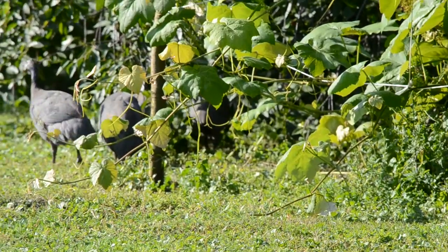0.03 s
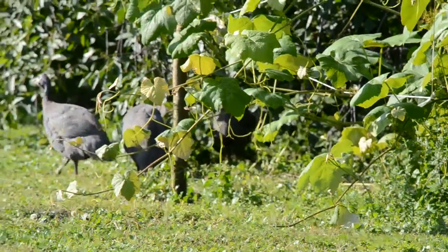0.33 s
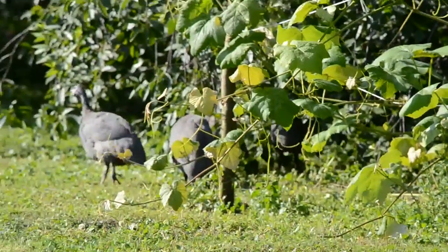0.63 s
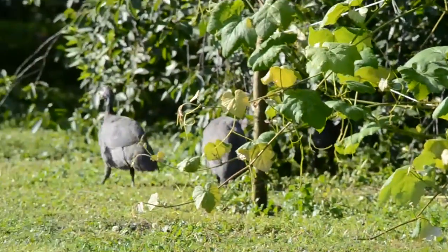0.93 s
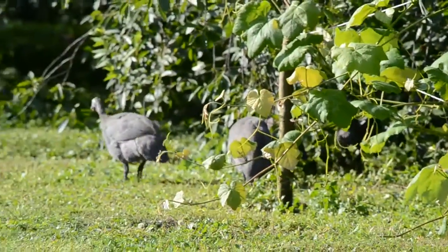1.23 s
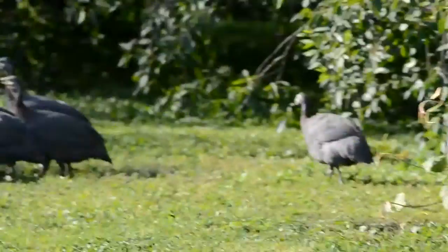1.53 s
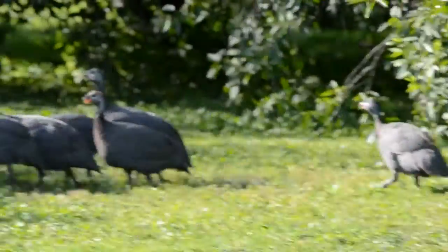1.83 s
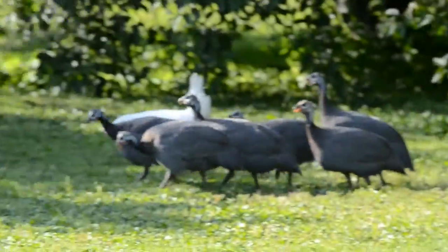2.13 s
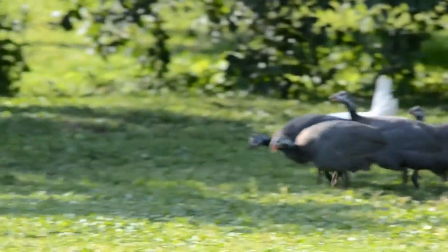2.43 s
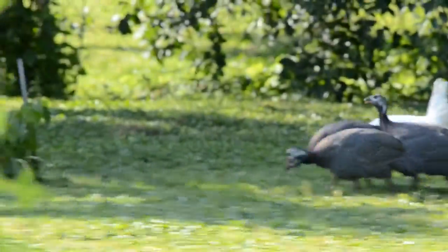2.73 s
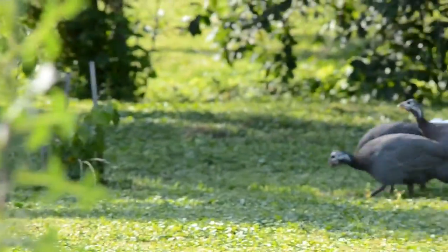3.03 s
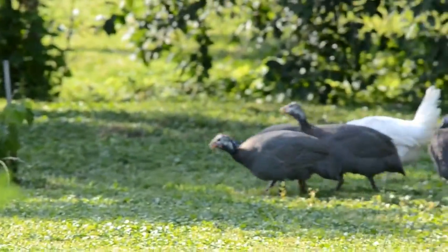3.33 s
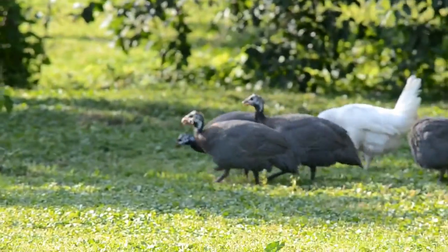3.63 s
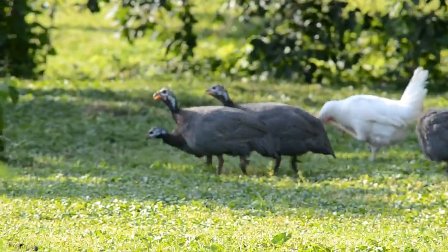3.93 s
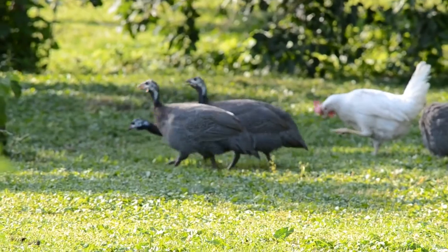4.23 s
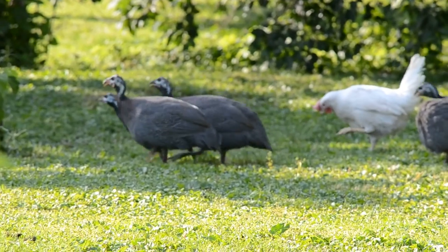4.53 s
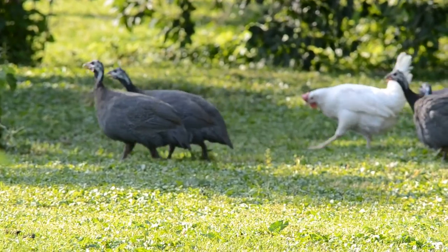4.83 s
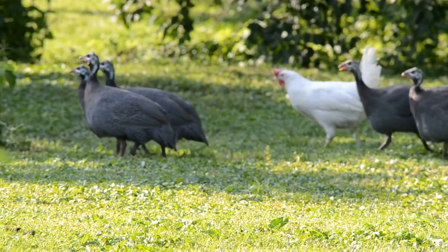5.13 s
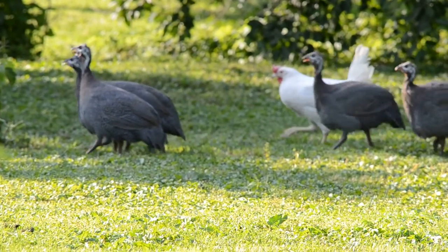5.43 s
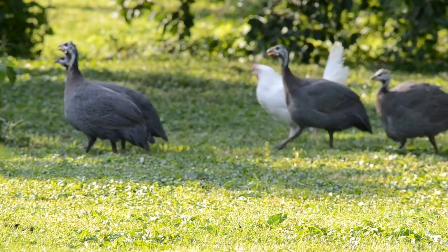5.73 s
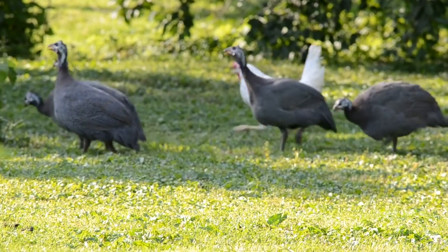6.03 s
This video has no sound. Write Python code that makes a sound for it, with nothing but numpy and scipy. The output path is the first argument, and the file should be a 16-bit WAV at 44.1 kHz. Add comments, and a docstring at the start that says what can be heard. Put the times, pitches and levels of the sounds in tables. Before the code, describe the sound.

Guinea fowl give short, high, repeated chirps over a quiet garden hush, with a few camera handling knocks and dry grass crackles.

```python
"""Over a steady garden hush, guinea fowl cross a lawn, keeping in touch with short two-humped chirps
whose pitch and level follow vocal effort; hedges scatter the sound back. Dry snaps, distant peeps,
one hollow pip and two-note whistles join. From 0.7 s knocks ring the body of a panning hand-held
camera. Soft answers, far trills and leaf rustles follow; grass crackle peaks near 3 s."""
import sys
import numpy as np
from scipy import signal
from scipy.fft import rfft, irfft
from scipy.io import wavfile
from scipy.ndimage import map_coordinates

SR = 44100
rng = np.random.default_rng(int(sys.argv[2]) if len(sys.argv) > 2 else 0)


def store_pcm(level_fs):
    """Save levels as 16-bit WAV."""
    pcm = np.round(np.clip(level_fs, -1, 1) * 32767).astype(np.int16)
    wavfile.write(sys.argv[1], SR, np.atleast_2d(pcm).T)


N = 277389
T = np.arange(N) / SR

# Air in foliage: (frequency [Hz], relative density [dB])
HUSH_SPECTRUM = [(15, -70), (25, -19.5), (137, -9.5), (453, -2.5), (1220, -6.5), (1660, -8.5),
                 (2250, -10.5), (2550, -7.5), (3200, -11.5), (3640, -5), (4130, -14), (4460, -10),
                 (5460, -16.5), (8850, -26.5), (10800, -30), (14100, -39.5), (22000, -120)]
# Nearest birds: (crest time [s], rise [s], level [dB], second hump gain [dB], scattered share [0-1])
NEAR_CHIRPS = [(.01, 0.022, -38.5, -3, 0.42), (0.708, 0.035, -36.5, 1.5, 0.42),
               (.737, 0.033, -36, -4, 0.42), (1.445, 0.052, -36.5, -2.5, 0.19),
               (1.941, 0.05, -36.5, -2, 0.07), (2.007, 0.043, -38.5, 2.5, 0.48),
               (2.381, 0.053, -43, 3, 0.3), (2.924, 0.06, -40, -1.5, 0.08), (3.292, 0.043, -36, 0, 0.08),
               (3.797, 0.029, -38.5, 2, 0.48), (4.246, .04, -39.5, .5, 0.29),
               (4.867, 0.044, -38, -2.5, 0.25), (5.54, 0.043, -39.5, -3, 0.31),
               (5.556, .027, -36, -2, 0.48), (6.104, 0.052, -39.5, 2.5, 0.17)]
# Chirp harmonics 2-4: (relative level in lead-in [dB], at full voice [dB])
CHIRP_OVERTONES = [(7.5, -23), (-5, -25.5), (-17, -36)]
# Hedge echo: (frequency [Hz], gain [dB])
HEDGE_SPECTRUM = [(100, 9), (500, 0.5), (1500, -0.5), (3300, 0), (4300, -2), (5200, 5), (12000, -3.5)]
# Dry snaps: (time [s], level [dB], decay [s], treble cut [Hz])
DRY_SNAPS = [(0.2221, -36, 0.0017, 5500), (1.2532, -33, 0.0021, 10700), (2.3159, -36.5, 0.0024, 17000),
             (3.0255, -49, 0.00092, 3040), (3.153, -50.5, .0014, 3000), (3.6702, -38.5, 0.0032, 14000),
             (4.913, -51.5, 0.0005, 8800), (6.093, -53.5, 0.0004, 9000)]
# Snaps, rustles and grass: (frequency [Hz], gain [dB])
CRACK_SPECTRUM = [(60, 1.5), (250, -9.5), (500, -4), (1400, -7.5), (2700, -2), (3400, -10), (4300, -4),
                  (5500, -12.5), (7500, -17.5), (9000, -15), (12000, -33)]
# Distant peeps: (start [s], length [s], middle pitch [Hz], slope [oct], arch [oct], level [dB])
FAR_PEEPS = [(0.417, 0.072, 3275, 0.24, 0.7, -55.5), (2.237, 0.033, 4580, .14, .05, -60.5),
             (4.049, .035, 4740, .22, .03, -55.5), (4.412, 0.032, 5320, -0.047, 0.023, -65),
             (5.06, 0.035, 2360, -0.41, -0.046, -62), (5.356, .058, 4320, -0.25, -0.016, -66),
             (5.424, .06, 2750, -.8, -0.025, -70), (5.749, 0.048, 5350, -0.028, 0.07, -63.5),
             (5.802, 0.034, 4060, -0.14, 0, -54.5)]
# Two-note whistles: (held note start [s], level [dB])
FAR_WHISTLES = [(0.655, -52.5), (1.547, -55), (2.686, -55), (3.62, -56.5), (4.492, -56.5), (5.452, -51.5)]
# Knocks on the camera: (time [s], level [dB], scrape length [s])
CAMERA_KNOCKS = [(.674, -46, 0.00235), (.701, -55, 0.0023), (.853, -54, .0024), (1.094, -39, 0.0043),
                 (1.3996, -23, 0.0028), (1.4228, -34, 0.0036), (1.55, -55, .0069), (1.617, -49, 0.0039),
                 (1.731, -55.5, 0.002), (1.912, -32, .0029), (1.967, -32, 0.0036), (2.808, -34, .0024),
                 (3.348, -43, 0.00488), (3.654, -42, .0028), (4.172, -47.5, 0.00084), (5.341, -55.5, 0.008),
                 (6.09, -48.5, 0.0021), (6.249, -58.5, 0.0027)]
# Camera body modes: (frequency [Hz], relative level [dB], t60 [s])
BODY_MODES = [(159, -18, 0.055), (223, -14, 0.062), (290, -21.5, 0.1), (351.7, -12.5, 0.074),
              (425.5, -8, 0.061), (550, -7.5, 0.036), (832, -4, 0.054), (976, -6.5, 0.046),
              (1270, 0, 0.034), (1413, 5.5, 0.011), (1533, 5.5, 0.026), (1913, -0.5, 0.012),
              (2314, 1.5, 0.022), (2840, -5, 0.04), (4460, 0.5, 0.0034), (5400, -5.5, 0.0066),
              (9300, 6, 0.0034)]
# Answers within the flock: (crest time [s], level [dB], second hump gain [dB])
SOFT_ANSWERS = [(1.149, -51, 3.5), (2.5, -47.5, 0.5), (3.883, -48, 3), (4.684, -49, -1), (6.006, -50, 1.5)]
# Distant trills: (first peak [s], length [s], warble rate [Hz], level [dB])
FAR_TRILLS = [(1.277, 0.057, 27, -51), (1.588, .095, 15, -55.5), (2.724, .11, 25.3, -56.5),
              (3.108, 0.083, 25.6, -55), (3.636, 0.13, 26, -56.5), (4.095, 0.069, 27, -47.5),
              (4.532, .095, 27, -55.5), (5.444, 0.083, 34, -54.5)]
# Leaves and grass: (time [s], level [dB], decay [s], bass cut [Hz])
LEAF_RUSTLES = [(1.7964, -56, 0.0047, 7100), (2.018, -43.5, 0.0054, 4400), (2.333, -42, 0.091, 500),
                (3.182, -55, 0.007, 5100), (3.244, -46, 0.0071, 3430), (3.4084, -55, 0.0016, 2520),
                (3.4132, -42, 0.014, 880), (3.4571, -48, 0.024, 1960)]


def undb(db):
    """Decibels to gain."""
    return 10 ** (np.asarray(db) / 20)


def unit_rms(x):
    """Scale to rms 1."""
    return x / np.sqrt(np.mean(x ** 2))


def add(out, time_s, x):
    """Mix x into out at time_s."""
    i = int(round(time_s * SR))
    x, i = x[max(-i, 0):], max(i, 0)
    out[i:i + len(x)] += x[:max(len(out) - i, 0)]


def wander(size, rate_hz):
    """Smooth random curve, spread about 1."""
    at = np.arange(size) * rate_hz / SR
    return map_coordinates(rng.standard_normal(512), [at], order=3, mode="wrap")


def butter(x, hz, kind, order=2):
    """Low-pass or high-pass."""
    return signal.sosfilt(signal.butter(order, min(hz, .45 * SR), kind, fs=SR, output="sos"), x)


def colour(x, spectrum):
    """Minimum-phase filter through (frequency [Hz], gain [dB]) points."""
    size = 4096
    hz, db = np.transpose(spectrum)
    bins_hz = np.arange(size // 2 + 1) * SR / size
    gain = undb(np.interp(np.log(bins_hz + 1), np.log(hz), db))
    cepstrum = irfft(np.log(gain))
    cepstrum[1:size // 2] *= 2
    cepstrum[size // 2 + 1:] = 0
    return signal.fftconvolve(x, irfft(np.exp(rfft(cepstrum))))[:len(x)]


def burst(x, db, span_s):
    """Scale x so that its energy, spread over span_s, has level db."""
    return x * undb(db) * np.sqrt(span_s * SR / np.sum(x ** 2))


def garden(hush_db=-61, sway_db=1.0, grass_db=-73, ticks_per_s=500, pass_s=3.0, spread_s=2.7):
    """Air hushes in foliage; grass crackles most as the flock hurries by."""
    hush = unit_rms(colour(rng.standard_normal(N), HUSH_SPECTRUM))
    hush *= undb(hush_db + sway_db * wander(N, 3.797))
    ticks = rng.standard_normal(N) * (rng.random(N) < ticks_per_s / SR) * undb(4 * wander(N, 14))
    grass = unit_rms(butter(colour(ticks, CRACK_SPECTRUM), 4400, "high"))
    passing = np.exp(-((T - pass_s) / spread_s) ** 2 / 2)
    return hush + undb(grass_db) * grass * passing


def chirp(rise_s, fall_s, crest_hz, hump_effort, hump_db, scattered):
    """Effort crests, sinks to a break and lifts again; pitch and level follow, the voice roughens."""
    hump_s, rest_hz, break_sag_hz, end_sag_hz = .037, 2783, 129.3, 205
    shoulder_effort, opening_effort = .42, .25
    closed_db, flutter_db, dull_db = -24, 4.0, -26
    jitter, drift, rasp, fray_rad = .053, .0139, .3, .5
    t = np.arange(0, rise_s + fall_s + hump_s, 1 / SR)
    stage = np.interp(t, np.cumsum([0, rise_s, fall_s, hump_s]), np.arange(4))
    up, down, again = (np.clip(stage - k, 0, 1) for k in range(3))
    swell = np.sin(np.pi / 2 * up ** 1.5) ** 2
    sink = shoulder_effort * (1 - down ** 8) + (1 - shoulder_effort) * np.cos(np.pi / 2 * down) ** 2
    effort = swell * sink + hump_effort * np.abs(np.sin(np.pi * again)) ** .797
    rough = np.interp(down ** 1.44, [0, 1], [.13, .773])
    # The membrane shakes in pitch and strength.
    pitch_hz = rest_hz + (crest_hz - rest_hz) * effort
    pitch_hz -= break_sag_hz * down ** 4 + end_sag_hz * again ** 2
    pitch_hz *= 1 + jitter * rough * wander(len(t), 384.9) + drift * wander(len(t), 90.8)
    phase = 2 * np.pi * np.cumsum(pitch_hz) / SR
    closed = np.exp(-effort / opening_effort) * (1 - .39 * down)
    level_db = closed_db * closed + hump_db * down ** 4
    level_db += flutter_db * np.sqrt(rough) * np.tanh(wander(len(t), 288.7))
    voice = np.sin(phase) + rasp * rough * wander(len(t), 1800) * np.cos(phase)
    # Reedy lead-in; at full voice the throat favours the fundamental.
    # Uneven cycles fray the overtones, foliage dulls them.
    frayed_phase = phase + fray_rad * np.sqrt(rough) * wander(len(t), 1100)
    for harmonic, (soft_db, full_db) in enumerate(CHIRP_OVERTONES, start=2):
        overtone_db = np.interp(up, [.25, .7], [soft_db, full_db]) + dull_db * scattered ** 2
        voice += undb(overtone_db) * np.sin(harmonic * frayed_phase)
    envelope = np.sqrt(2) * undb(level_db) * signal.windows.tukey(len(t), .06)
    return scatter(envelope * voice, scattered)


def scatter(x, share, decay_s=.0077):
    """A share of the call takes longer paths through grass and leaves, and blurs."""
    t = T[:SR // 16]
    paths = signal.fftconvolve(x, rng.standard_normal(len(t)) * np.exp(-t / decay_s))
    paths *= np.linalg.norm(x) / np.linalg.norm(paths)
    direct = np.pad(x, (0, len(t) - 1))
    return np.sqrt(1 - share) * direct + np.sqrt(share) * paths


def flock(typical_rise_s=.04, typical_fall_s=.035):
    """Nearest guinea fowl: the slower a chirp rises, the faster it falls."""
    out = np.zeros(N)
    for crest_s, rise_s, db, hump_db, scattered in NEAR_CHIRPS:
        fall_s = typical_fall_s * (typical_rise_s / rise_s) ** .41
        call = chirp(rise_s, fall_s, crest_hz=4317, hump_effort=.56, hump_db=hump_db, scattered=scattered)
        add(out, crest_s - rise_s, undb(db) * call)
    return out


def hedges(x, early_db=-12, early_t60_s=.28, late_db=-18, late_t60_s=.62):
    """Leaves return many small early echoes; far trees add a thin tail."""
    t = T[:SR]
    echoes = rng.standard_normal(len(t)) * (1 - np.exp(-t / .0013))
    early = echoes * undb(-60 * t / early_t60_s)
    late = rng.permutation(echoes) * undb(-60 * t / late_t60_s) * (1 - np.exp(-t / .049))
    early *= undb(early_db) / np.linalg.norm(early)
    late *= undb(late_db) / np.linalg.norm(late)
    return signal.fftconvolve(x, colour(early + late, HEDGE_SPECTRUM))[:N]


def crack(decay_s, bass_hz, treble_hz, splinter=.91):
    """A sharp impulse, then splinters dying away."""
    t = T[:SR // 10]
    force = splinter * rng.standard_normal(len(t)) * np.exp(-t / decay_s)
    force[0] += 1
    return butter(butter(colour(force, CRACK_SPECTRUM), bass_hz, "high"), treble_hz, "low")


def snaps(bass_hz=270):
    """Short, full, dry cracks."""
    out = np.zeros(N)
    for time_s, db, decay_s, treble_hz in DRY_SNAPS:
        add(out, time_s, burst(crack(decay_s, bass_hz, treble_hz), db, span_s=.011))
    return out


def note(length_s, middle_hz, slope_oct, arch_oct, waver=.023):
    """A thin distant bird note that glides and arches."""
    u = np.linspace(-1, 1, int(length_s * SR))
    pitch_hz = middle_hz * 2 ** (slope_oct * u / 2 - arch_oct * np.abs(u) ** 1.5)
    pitch_hz *= 1 + waver * wander(len(u), 385)
    envelope = np.sqrt(2 * (1 - u ** 2))
    return scatter(envelope * np.sin(2 * np.pi * np.cumsum(pitch_hz) / SR), share=.56)


def peeps():
    """Stray single notes from distant birds."""
    out = np.zeros(N)
    for start_s, length_s, middle_hz, slope_oct, arch_oct, db in FAR_PEEPS:
        add(out, start_s, undb(db) * note(length_s, middle_hz, slope_oct, arch_oct))
    return out


def pip(time_s=.569, hz=1720, db=-43, decay_s=.00088):
    """One small hollow pip: a fast-damped tone."""
    out, t = np.zeros(N), T[:SR // 20]
    ring = t * np.exp(-t / decay_s) * np.sin(2 * np.pi * hz * t)
    add(out, time_s, burst(ring, db, span_s=.0048))
    return out


def whistles(lead_ahead_s=.037, lead_gain_db=-8.5):
    """Distant birds step from a thin high note down to a held one."""
    out = np.zeros(N)
    for start_s, db in FAR_WHISTLES:
        lead = note(length_s=.04, middle_hz=5530, slope_oct=.025, arch_oct=0)
        held = note(length_s=.06, middle_hz=4752, slope_oct=0, arch_oct=.013)
        add(out, start_s - lead_ahead_s, undb(db + lead_gain_db) * lead)
        add(out, start_s, undb(db) * held)
    return out


def knocks(scrape=.13, rebound=.28, tick_db=-22, bass_ratio=.12):
    """Push, scrape and rebound ring the camera body; harder knocks are brighter and thinner."""
    base_hz, hard_hz, hard_db, doubling_db = 400, 2920, -26, 10
    out, t = np.zeros(N), T[:SR // 6]
    body = sum((-1) ** k * undb(db - 60 * t / t60_s) * np.sin(2 * np.pi * hz * t)
               for k, (hz, db, t60_s) in enumerate(BODY_MODES))
    for time_s, db, scrape_s in CAMERA_KNOCKS:
        bright_hz = base_hz + hard_hz * 2 ** ((db - hard_db) / doubling_db)
        force = scrape * rng.standard_normal(len(t)) * t / scrape_s * np.exp(1 - 2 * t / scrape_s)
        force[SR // 2000] += 1  # push
        force[int(scrape_s * SR)] += rebound
        ring = signal.fftconvolve(force, body)[:len(t)]
        ring = butter(ring, bass_ratio * bright_hz, "high", order=1)
        knock = butter(ring, bright_hz, "low") + undb(tick_db) * ring
        add(out, time_s, burst(knock, db, span_s=.02))
    return out


def answers(rise_s=.028, fall_s=.014):
    """Soft, quick, heavily scattered chirps from inside the flock."""
    out = np.zeros(N)
    for crest_s, db, hump_db in SOFT_ANSWERS:
        call = chirp(rise_s, fall_s, crest_hz=4038, hump_effort=.76, hump_db=hump_db, scattered=.86)
        add(out, crest_s - rise_s, undb(db) * call)
    return out


def trills(top_hz=4900, depth=.33, sink=.28, jitter=.0298, flutter_db=3, lead_cycles=.66):
    """A bird further back swings its pitch in arches that sink as the call runs out."""
    out = np.zeros(N)
    for peak_s, length_s, rate_hz, db in FAR_TRILLS:
        t = np.arange(-lead_cycles / rate_hz, length_s, 1 / SR)
        arches = 1 - depth * np.abs(np.sin(np.pi * rate_hz * t)) ** 1.7
        sag = 1 - sink * (np.maximum(t, 0) / length_s) ** 1.5
        pitch_hz = top_hz * arches * sag * (1 + jitter * wander(len(t), 397))
        level_db = db + flutter_db * wander(len(t), 301)
        envelope = np.sqrt(2) * undb(level_db) * signal.windows.tukey(len(t), .3)
        call = envelope * np.sin(2 * np.pi * np.cumsum(pitch_hz) / SR)
        add(out, peak_s + t[0], scatter(call, share=.47, decay_s=.018))
    return out


def rustles(treble_hz=13500):
    """Leaves and grass: thinner than snaps, splintering for longer."""
    out = np.zeros(N)
    for time_s, db, decay_s, bass_hz in LEAF_RUSTLES:
        add(out, time_s, burst(crack(decay_s, bass_hz, treble_hz), db, span_s=.011))
    return out


def scene(crack_send_db=2, crack_send_hz=4500, knock_send_db=-14):
    """Birds and cracks sound out in the garden; knocks, right at the microphone, echo little."""
    birds = flock() + answers() + trills() + whistles() + peeps()
    cracks = snaps() + rustles()
    bumps = knocks()
    crack_send = undb(crack_send_db) * butter(cracks, crack_send_hz, "low", order=1)
    echo = hedges(birds + crack_send + undb(knock_send_db) * bumps)
    return (garden() + birds + echo + cracks + pip() + bumps)[None]


def record(dry, cut_hz=10400, leak_hz=13000, leak_db=-13, top_hz=15400):
    """The camera cuts the top steeply; a trace of the highest treble leaks through."""
    passband = butter(dry, cut_hz, "low", order=20)
    leak = undb(leak_db) * butter(dry, leak_hz, "high", order=10)
    return signal.sosfilt(signal.ellip(8, .2, 70, top_hz, fs=SR, output="sos"), passband + leak)


dry = scene()
out = record(dry)
store_pcm(out)
```